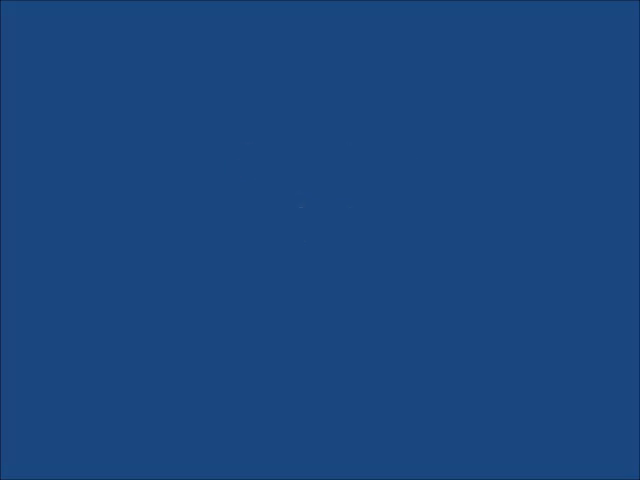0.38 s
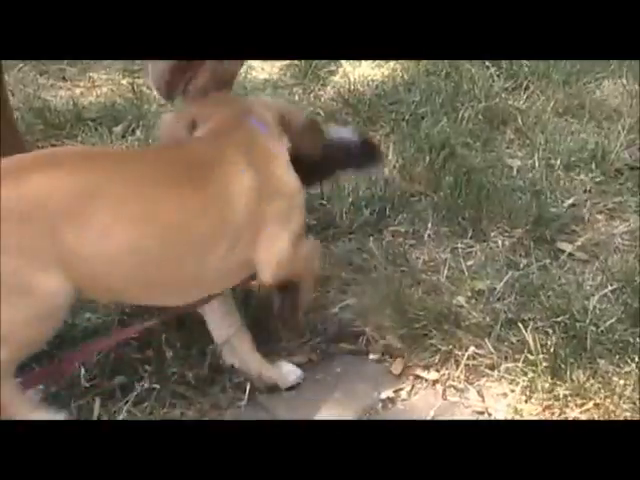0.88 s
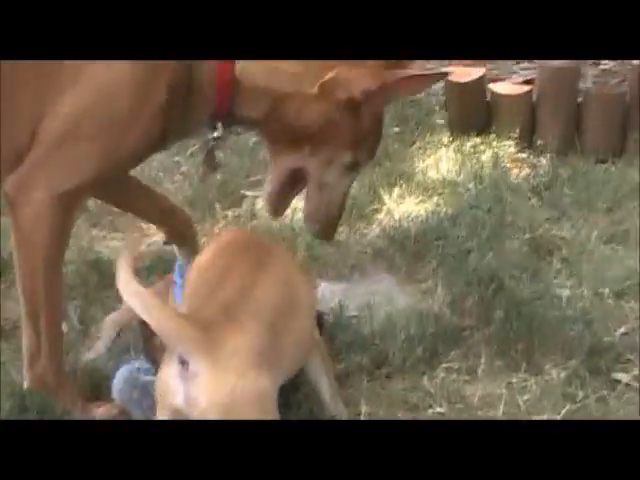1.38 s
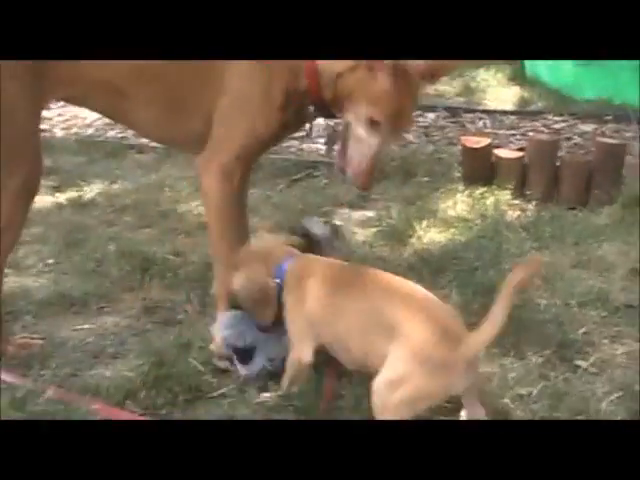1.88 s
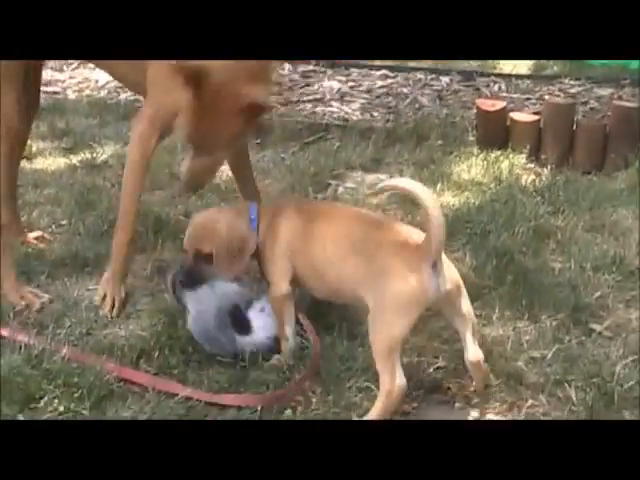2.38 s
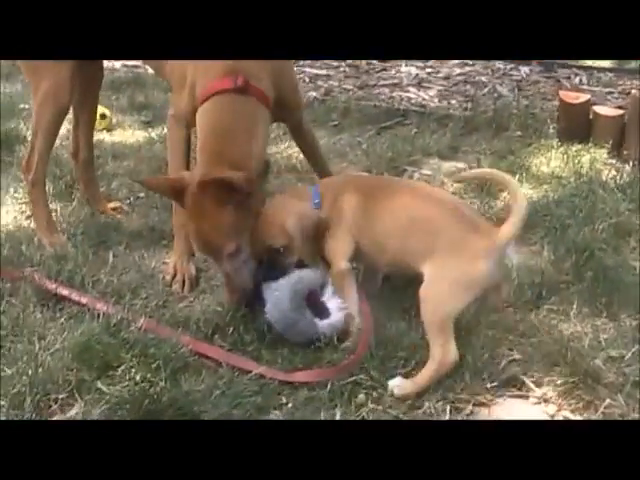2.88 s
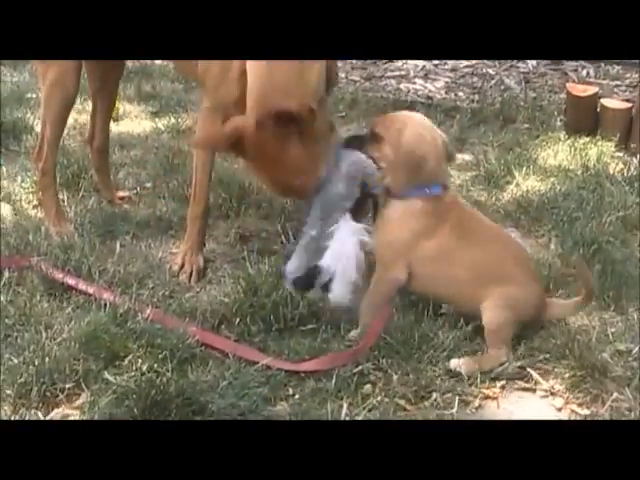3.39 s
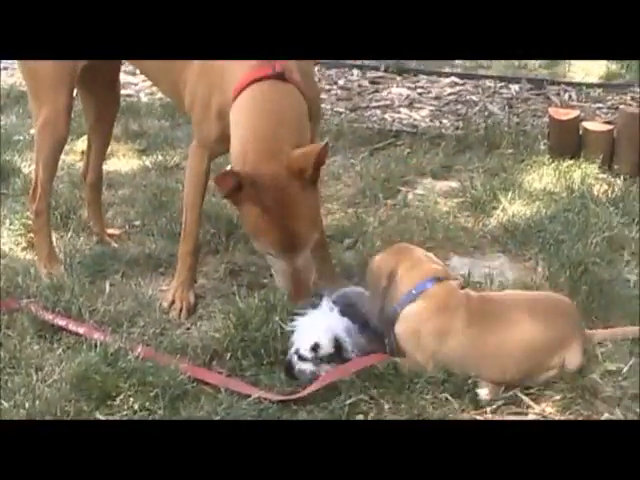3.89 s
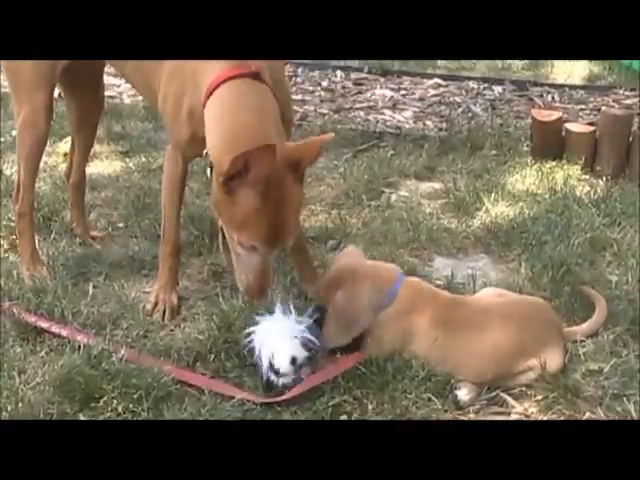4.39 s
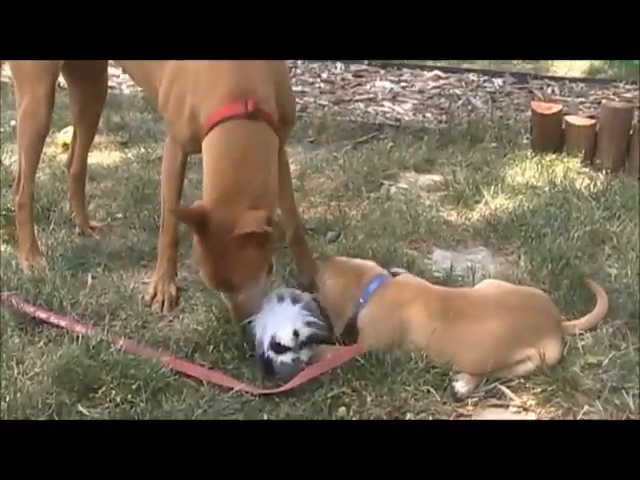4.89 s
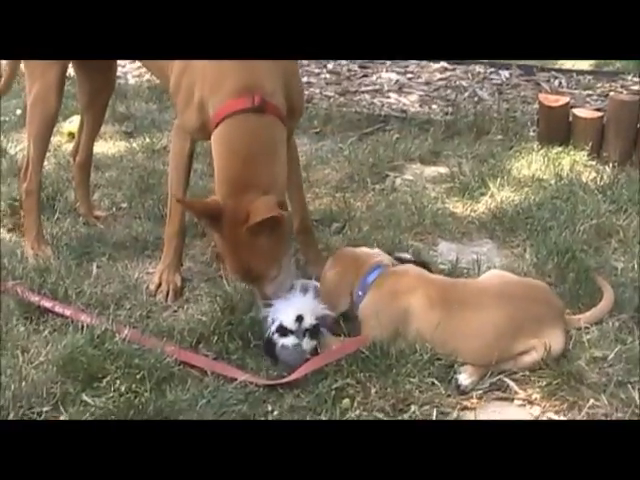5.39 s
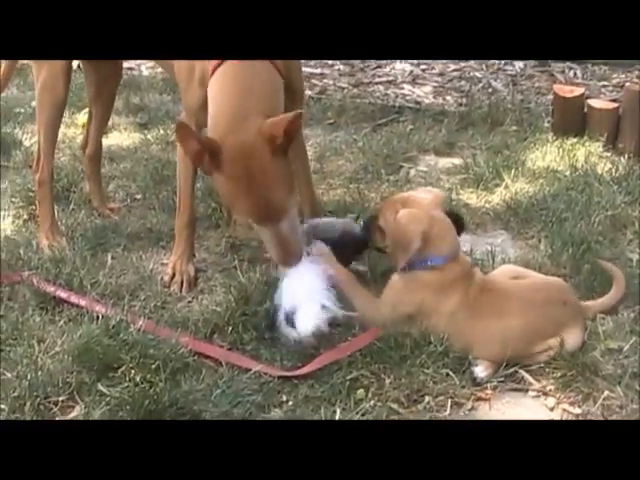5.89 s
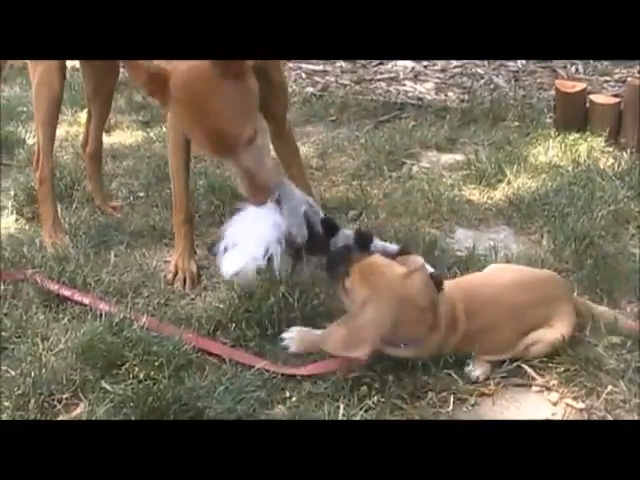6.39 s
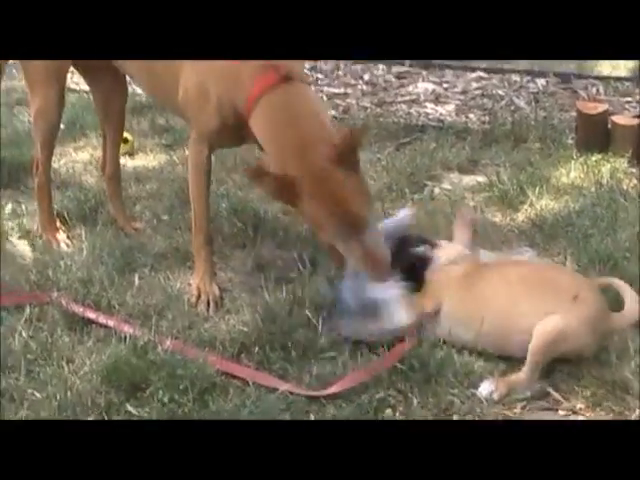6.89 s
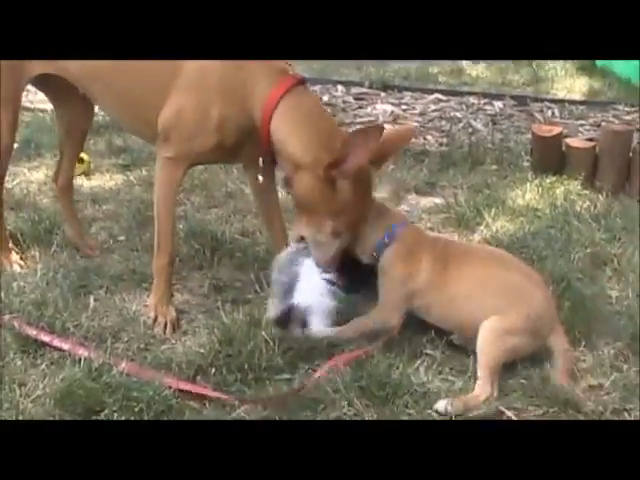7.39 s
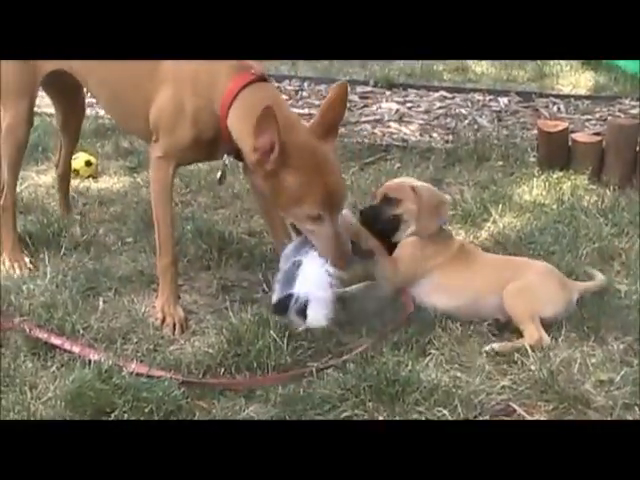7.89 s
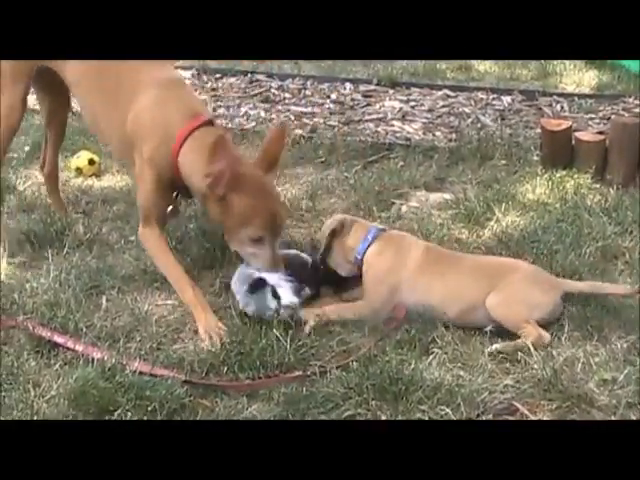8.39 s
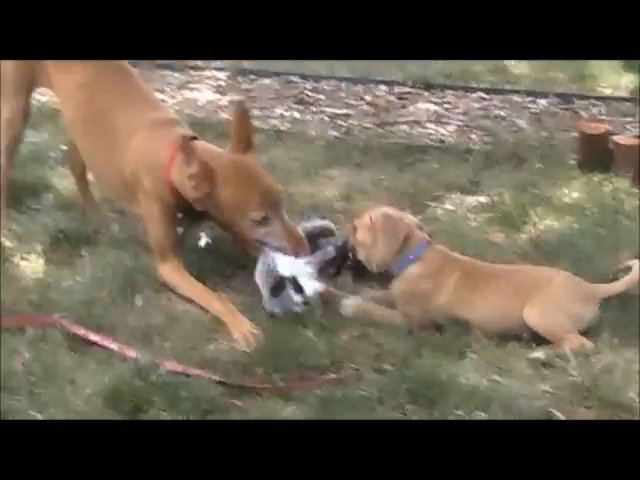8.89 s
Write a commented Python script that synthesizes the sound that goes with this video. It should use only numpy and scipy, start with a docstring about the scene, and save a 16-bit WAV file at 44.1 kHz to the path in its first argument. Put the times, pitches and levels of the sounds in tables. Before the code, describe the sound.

Close stereo pickup of a dog and puppy playing on a lawn after half a second of silence. Paws and toy drag through dry grass, twigs snap, and metal tags tick and ring, loudest around three seconds, then sparser. A woody knock comes early. Near two-note sparrow phrases mix with farther, hoarse falling cheeps and reflections. Faint town rumble and light wind lie below, with dull paw thumps and a faint growl late.

```python
"""Tug-of-war on a lawn

A dog and a puppy tug at a plush toy: struck modes ring as collar tags, noise grains rustle as grass, with snaps.
A driven hollow body knocks once, filtered clicks thump as paws, filtered pulses growl faintly.
Sparrows are gliding one- and two-voiced whistles, one near, others echoing off walls.
Below lie shaped noise and hums of a distant town, and low wind lumps.
"""
import sys
import numpy as np
from scipy import signal
from scipy.io import wavfile
from scipy.ndimage import uniform_filter1d

SR = 44100
rng = np.random.default_rng(int(sys.argv[2]) if len(sys.argv) > 2 else 0)


def master(y):
    """Save y as 16-bit WAV."""
    cut = np.clip(np.atleast_2d(y).T, -1, 1)
    pcm = np.round(cut * 32767)  # scale
    wavfile.write(sys.argv[1], SR, pcm.astype(np.int16))


def decibels_to_gain(level_db):
    """Convert a level in decibels to a linear amplitude gain (20 dB per decade)."""
    exponent = np.asarray(level_db, float) / 20
    return 10 ** exponent


N = 397782


def rms_one(x):
    """Scales to unit rms."""
    return x / np.sqrt(np.mean(x ** 2) + 1e-20)


def in_time(rows):
    """Interpolates each column over time."""
    s, *columns = np.transpose(rows)
    return [np.interp(np.arange(N) / SR, s, column) for column in columns]


def at_hz(points, hz):
    """Interpolates a curve over log frequency."""
    table_hz, values = np.transpose(points)
    return np.interp(np.log(hz), np.log(table_hz), values)


def drift(rate_hz):
    """Slow random wander of unit rms: noise through two equal poles at rate_hz, run at SR / 40."""
    r = np.exp(-80 * np.pi * rate_hz / SR)
    white = rng.standard_normal(N // 40 + 2002)
    slow = signal.lfilter([1], [1, -2 * r, r * r], white)[2000:]
    return np.interp(np.arange(N) / 40, np.arange(len(slow)), rms_one(slow - slow.mean()))


def clicks(times_s, sizes):
    """Single-sample impulses on a tiny floor."""
    out = np.full(N, 1e-18)
    np.add.at(out, np.round(np.asarray(times_s) * SR).astype(int), sizes)
    return out


def ring(x, hz, t60_s):
    """Two-pole resonator: a unit click starts a decaying sine of height 1."""
    r, w = decibels_to_gain(-60 / (t60_s * SR)), 2 * np.pi * hz / SR
    return signal.lfilter([0, np.sin(w)], [1, -2 * r * np.cos(w), r * r], x)


def band(x, low_hz, high_hz):
    """Butterworth band-pass."""
    sos = signal.butter(2, [low_hz, min(high_hz, .45 * SR)], "band", fs=SR, output="sos")
    return signal.sosfilt(sos, x)


def pan(x, left_over_right_db):
    """Splits a level difference evenly over both ports."""
    return x * decibels_to_gain(np.array([[left_over_right_db / 2], [-left_over_right_db / 2]]))


def swells(rows):
    """Sum of humps that swell linearly to a peak and fade linearly."""
    t = np.arange(N) / SR
    return sum(decibels_to_gain(db) * np.interp(t, [s - up_s, s, s + down_s], [0, 1, 0]) for s, db, up_s, down_s in rows)


# Stereo likeness: (frequency [Hz], left-right likeness [-1..1])
LIKENESS = [(40, .2), (80, 0.35), (160, 0.022), (300, 0), (700, 0.21), (1400, 0.4), (3000, 0.028),
            (8000, 0.29)]
# Stereo balance: (frequency [Hz], left over right [dB])
BALANCE_DB = [(60, 0.5), (500, 2), (2000, 1.5), (8000, 0.5)]


def coloured(white, spectrum, patchy_db):
    """Half-octave bands of (draw, mid/side) noise, each with its level, flicker, likeness and balance."""
    out = 0
    edges_hz = 20 * 2 ** np.arange(0, 10.1, .5)
    for k, (low_hz, high_hz) in enumerate(zip(edges_hz, edges_hz[1:])):
        mid, side = band(white[k % 2], low_hz, high_hz)
        centre_hz = np.sqrt(low_hz * high_hz)
        alike = np.clip(at_hz(LIKENESS, centre_hz), -.95, .95)
        both = np.sqrt(1 + alike) * mid + np.sqrt(1 - alike) * side * [[1], [-1]]
        level_db = at_hz(spectrum, centre_hz) + patchy_db * drift(2.77)
        out = out + decibels_to_gain(level_db) * pan(both, at_hz(BALANCE_DB, centre_hz))
    return out


# Tag touches: (time [s], tick drive [dB], ring drive [dB], family struck hardest)
TAG_TOUCHES = [(.6115, -41, -48, "c"), (.6333, -42, -55, "d"), (1.14, -33, -50, "d"),
               (1.452, -39, -43, "a"), (1.9739, -32, -44, "d"), (2.418, -36, -43.5, "b"),
               (2.4693, -32, -55, "d"), (2.6786, -30, -40.5, "d"), (2.8486, -15, -32, "b"),
               (2.8613, -17, -34, "b"), (2.8691, -14, -27.5, "b"), (2.9684, -42, -55, "d"),
               (3.29, -18.5, -38, "a"), (3.4291, -29, -58, "d"), (3.464, -34, -45, "a"),
               (3.7389, -39, -52, "d"), (4.421, -44, -59.5, "d"), (4.6907, -41, -54, "d"),
               (4.7451, -50, -58, "d"), (5.0941, -52, -67, "d"), (5.1487, -50, -59, "d"),
               (5.4999, -45, -52.5, "d"), (6.2974, -42, -59, "d"), (7.0058, -44, -55, "d"),
               (7.171, -24, -44.5, "d"), (7.1906, -17, -39, "b"), (7.5331, -44, -56, "d"),
               (8.0012, -39, -52.5, "d"), (8.448, -42, -51, "d"), (8.659, -40, -45, "c")]
# Tag modes: (frequency [Hz], level in family [dB], t60 [s], family)
TAG_MODES = [(9553, -1, .3, "a"), (9565, -2, .3, "a"), (14560, -6, .08, "a"), (10580, 2, 0.052, "b"),
             (10680, 5, 0.035, "b"), (5300, -4, .04, "b"), (11130, 6, 0.056, "c"), (13915, 1.5, .08, "c"),
             (12140, 14.5, 0.049, "d"), (7760, -.5, .05, "d")]
# Family coupling, rows = struck a-d: (gain of a [dB], of b [dB], of c [dB], of d [dB])
FAMILY_DB = [(-1, -16, -12, -16), (-26, 0.5, -16, -12.5), (-6, -10, 2.5, -26), (-5, -4.5, -11, -1)]


def tags():
    """Each touch ticks brightly, rings one metal mode family hardest and drives the others along."""
    spread_db = 3.5   # from touch to touch, on gains below 0 dB
    s, tick_db, ring_db = np.transpose([row[:3] for row in TAG_TOUCHES])
    struck = ["abcd".index(row[-1]) for row in TAG_TOUCHES]
    chance = rng.standard_normal((len(s), len(TAG_MODES)))
    out = decibels_to_gain(2.5) * band(clicks(s, decibels_to_gain(tick_db)), 4000, 17000)
    for k, (hz, mode_db, t60_s, family) in enumerate(TAG_MODES):
        along_db = np.array(FAMILY_DB)[struck, "abcd".index(family)]
        varied_db = along_db + spread_db * (along_db < 0) * chance[:, k - 1]
        sign = np.where(along_db != 0, np.sign(chance[:, k]), 1)
        out = out + ring(clicks(s, sign * decibels_to_gain(ring_db + mode_db + varied_db)), hz, t60_s)
    right = 0.59 * (out + np.roll(out, 1))   # half a sample late, slightly duller
    return np.array([out, right])


# Paws and toy dragging through grass: (time [s], level around 6.7-8.7 kHz [dB])
RUSTLE = [(.6, -53.5), (1.2, -54.5), (1.55, -56.5), (1.8, -53), (2.1, -63), (2.65, -56.5), (3.08, -57.5),
          (3.35, -62.5), (3.8, -57), (4.5, -66.5), (5.2, -72), (5.8, -67.5), (6.1, -61.5), (6.4, -60.5),
          (7, -60), (9.02, -62.5)]
# Quick scuffs, same level scale: (peak time [s], level [dB], swell [s], fade [s])
SCUFFS = [(6.927, -51.5, 0.012, 0.039), (7.6, -56.5, 0.2, 0.15), (8.48, -62.5, 0.2, 0.089)]
# Rustle colour: (frequency [Hz], relative density [dB per Hz])
GRASS_SPECTRUM = [(900, -16), (1500, 1.5), (3500, 2), (7000, 0.5), (12400, -2.5), (16000, -61)]


def grass():
    """Bending blades: clumped noise grains of random height, coloured, plus crackle."""
    height = decibels_to_gain(1.9 * np.minimum(rng.exponential(1, N), 6))
    grains_per_s = 6000 * decibels_to_gain(4 * drift(25))
    grain = height * (rng.random(N) < grains_per_s / SR)
    white = rng.standard_normal((2, 2, N)) * grain * [[1], [.6]]
    rustle = coloured(white, GRASS_SPECTRUM, patchy_db=2.0)
    rustle_db, = in_time(RUSTLE)
    level = decibels_to_gain(rustle_db) + swells(SCUFFS)
    return rustle * level / np.std(band(rustle, 6740, 8650)) + crackle(level)


def crackle(level):
    """Lone dry blades break by chance, louder as the grass rustles more."""
    born = rng.random(N) < 45 / SR   # 45 per s on average
    sizes = decibels_to_gain(24.5 + 2.3 * rng.standard_normal(N)) * rng.choice([-1, 1], N)
    return level * band(born * sizes + 1e-18, 3400, 10000)


# Dry grass and twigs snapping under paws: (time [s], peak [dB], snap frequency [Hz])
SNAPS = [(0.6424, -27.5, 6600), (0.6975, -27, 7140), (0.7058, -21.5, 8250), (0.725, -27.5, 1290),
         (0.848, -29, 6500), (.87, -28.5, 1130), (.908, -35, 8500), (1.636, -33, 8000), (1.955, -31, 2700),
         (2.8334, -34, 9000), (3.2117, -31, 9000), (3.7384, -29, 5270), (4.1984, -33.5, 9000),
         (4.977, -37, 8000), (5.61, -32, 5000), (5.7564, -33.5, 3280), (6.194, -33, 8000),
         (6.921, -27, 6000), (6.9493, -26.5, 4870), (7.161, -31, 4430), (7.4923, -36, 6500),
         (7.5288, -31.5, 5330), (7.615, -29, 4000), (8.0504, -30, 8000), (8.4735, -33, 6000),
         (8.4815, -29, 8000), (8.5318, -28.5, 8000), (8.5619, -36, 5500), (8.6714, -31.5, 7000),
         (8.944, -30, 8000)]


def snaps():
    """Each break is a few ms of noise fizz banded around its pitch."""
    out, size = np.zeros(N), 400
    fade = np.arange(size) * np.exp(-np.arange(size) / (0.00046 * SR))
    for s, db, hz in SNAPS:
        snap = band(rng.standard_normal(size) * fade, hz / 2.0, hz * 1.28)
        at = round(s * SR)
        out[at:at + size] += decibels_to_gain(db) * snap / np.max(np.abs(snap))
    return out


# Blows on the hollow body: (time [s], drive [dB])
KNOCK = [(1.8021, -9), (1.8109, -24)]
# Body modes: (frequency [Hz], relative level [dB], t60 [s])
KNOCK_MODES = [(1820, -10, 0.027), (2060, -3, 0.012), (1400, -19, 0.03), (2680, -13, 0.02), (930, -9, 0.03),
               (540, -21, .035)]


def knock():
    """A soft contact drives a hollow body's modes, off to the left."""
    right_lag_s, right_early_share = 0.00055, 0.57
    s, db = np.transpose(KNOCK)
    blow = band(clicks(s, decibels_to_gain(db)), 660, 3500)
    left = sum(decibels_to_gain(mode_db) * ring(blow, hz, t60_s) for hz, mode_db, t60_s in KNOCK_MODES)
    return np.array([left, np.roll(left, round(right_lag_s * SR)) + right_early_share * left])


# Paws landing on turf: (time [s], drive [dB], frequency [Hz])
THUMPS = [(8.33, -32, 230), (8.415, -33, 460)]


def paws():
    """Each landing is a short dull resonance."""
    return sum(band(ring(clicks([s], decibels_to_gain(db)), hz, .04), 60, 900) for s, db, hz in THUMPS)


def growl():
    """Low throaty rumble: uneven glottal pulses through two throat resonances."""
    start_s, loudest_s, end_s = 8.54, 8.6, 8.9
    pitch_hz, peak_db = 144.6, -50
    hump = swells([(loudest_s, peak_db, loudest_s - start_s, end_s - loudest_s)])
    level = hump ** 2 / decibels_to_gain(peak_db)
    cycles = np.cumsum(pitch_hz * (1 + 0.048 * drift(30))) / SR
    pulses = np.diff(np.floor(cycles), prepend=0) * (1 + 0.8 * rng.standard_normal(N))
    return level * rms_one(ring(pulses, 277, 0.058) + 0.53 * ring(pulses, 160, 0.039))


def birds():
    """Near notes come mostly direct, far cheeps mostly as scattered echoes; fence and house reflect."""
    near, lone, far = phrases() + links() + whistles(), lone_notes(), cheeps()
    behind = lone + decibels_to_gain(-5) * far
    fence = pan(np.roll(near, round(.025 * SR)) * decibels_to_gain(-7), -4)
    house = pan(np.roll(behind, round(.1 * SR)) * decibels_to_gain(-12), 1)
    scattered = scatter(decibels_to_gain(-3) * near + decibels_to_gain(-2) * lone + decibels_to_gain(3) * far, t60_s=.36, per_s=900)
    return near + behind + fence + house + scattered


def sing(start_s, hz, level, upper, rough, gap_hz=370):
    """A whistle and a second voice gap_hz above it (upper = its share); rough flutters pitch and level."""
    out, at, size = np.zeros(N), round(start_s * SR), len(hz)
    tremble, flutter = uniform_filter1d(rng.standard_normal((2, size)), size=50) * rough
    phase = 2 * np.pi * np.cumsum(hz) / SR + np.cumsum(tremble)
    gap = 2 * np.pi * gap_hz * np.arange(size) / SR
    voices = np.sin(phase) + upper * np.sin(phase + gap)
    out[at:at + size] = (level * (1 + 40 * flutter) * voices)[:N - at]
    return out


def arch(s, top_hz, db, rise_s, fall_s, bow, fade, gap_hz=370):
    """Climb to the top and drop back, second voice near the top; bow flattens it, fade hides the drop."""
    foot_hz = 3080
    t = np.arange(-rise_s, fall_s, 1 / SR)
    u = np.where(t < 0, t / rise_s, t / fall_s)
    shape = np.clip(1 - u ** 2, 0, 1) ** np.where(t < 0, 1.2, fade)
    upper = .9 * np.exp(-(u / .6) ** 2)
    hz = top_hz - (top_hz - foot_hz) * np.abs(u) ** bow
    return sing(s + t[0], hz, decibels_to_gain(db) * shape, upper, .045, gap_hz)


# Near sparrow's phrases: (top of second note [s], time since first [s],
# first note's lower voice [dB], second note's lower voice [dB], second top [Hz])
PHRASES = [(0.986, .086, -39, -34.5, 4650), (1.562, 0.1, -38, -36, 4480), (2.082, 0.099, -36.5, -38, 4575),
           (2.769, 0.1, -40, -36, 4470), (3.96, 0.086, -47, -38.5, 4520),
           (4.558, 0.097, -36.5, -33.5, 4560), (6.171, 0.09, -39, -34.5, 4647),
           (6.622, 0.095, -38, -36, 4670), (8.074, 0.091, -41.5, -37.5, 4660), (8.95, 0.12, -59, -48, 4500)]


def phrases():
    """Near sparrow: arched first note, rising stroke, slower arched second note."""
    out, size = 0, round(0.028 * SR)
    stroke_hz = np.linspace(3280, 4325, size)
    for s, gap_s, first_db, second_db, top_hz in PHRASES:
        out = out + arch(s - gap_s, top_hz + 50, first_db, .034 * 0.96, .017, bow=2.1, fade=1.1)
        out = out + arch(s, top_hz, second_db, .034 * 1.25, .017, bow=1.8, fade=1.1)
        stroke_level = decibels_to_gain(second_db - 7) * np.sqrt(np.hanning(size))
        out = out + sing(s - .06, stroke_hz, stroke_level, 0, rough=.035)
    return out


# Links outside the phrases: (time at bottom [s], bottom [Hz], lower voice [dB])
LINKS = [(.79, 3510, -43.5), (1.855, 3710, -45.5), (2.226, 3830, -45), (4.73, 3540, -46), (6.42, 3250, -50)]


def links():
    """Weak sag to the bottom, climb on which the second voice joins, quick drop; one follows each phrase."""
    t = np.arange(-.014, .036, 1 / SR)
    bend_hz = np.interp(t, [-.014, 0, .008, .026, .036], [250, 0, 150, 1050, 800])
    upper = np.interp(t, [.008, .02], [0, .7])
    level = np.interp(t, [-.014, -.008, .008, .024, .036], [0, .3, .3, 1, 0])
    after_phrases = [(s + .056, 3190, second_db - 5) for s, _, _, second_db, _ in PHRASES]
    return sum(sing(s - .014, hz + bend_hz, decibels_to_gain(db) * level, upper, rough=0.06)
               for s, hz, db in LINKS + after_phrases)


# Thin single whistles: (start [s], end [s], start pitch [Hz], end pitch [Hz], level [dB])
WHISTLES = [(6.35, 6.42, 5800, 4900, -53), (7.72, 7.755, 4620, 4600, -58), (7.785, 7.84, 4650, 4550, -56),
            (3.265, 3.295, 3200, 5300, -55), (3.752, 3.785, 3450, 3800, -51),
            (3.785, 3.82, 3050, 3000, -52), (4.79, 4.865, 3350, 3000, -51), (5.848, 5.857, 4100, 4600, -50),
            (5.862, 5.91, 3750, 3600, -54)]


def whistles():
    """Lone one-voiced glides with short soft edges."""
    out = 0
    for start_s, end_s, start_hz, end_hz, db in WHISTLES:
        size = round((end_s - start_s) * SR)
        level = decibels_to_gain(db) * np.hanning(size) ** 0.044
        out = out + sing(start_s, np.linspace(start_hz, end_hz, size), level, 0, rough=0.045)
    return out


# A third sparrow's lone notes: (time at top [s], top [Hz], lower voice [dB])
LONE_NOTES = [(.717, 5200, -44), (1.086, 5100, -40), (1.187, 3950, -49.5), (1.432, 5100, -43.5),
              (1.779, 5220, -38), (2.152, 5710, -35), (2.577, 5630, -35.5), (2.985, 5560, -44),
              (3.705, 4680, -52), (5.186, 5160, -52), (5.938, 5050, -53), (8.262, 5030, -53.5),
              (8.845, 5100, -52)]


def lone_notes():
    """Third sparrow: single two-voiced arches whose drop is nearly hidden."""
    return sum(arch(s, hz, db, .02, .034, bow=2.6, fade=2.6, gap_hz=430) for s, hz, db in LONE_NOTES)


# Far sparrow's falling cheeps: (start [s], reference pitch [Hz], relative level [dB], hoarseness [factor])
CHEEPS = [(0.926, 5500, -47, 1.6), (1.425, 5120, -48, 2.5), (2.554, 5820, -45.5, 1.8),
          (2.97, 5500, -46, 1.4), (3.425, 5670, -49.5, 2), (3.91, 5590, -46, 1.5), (4.144, 5310, -53, 1.9),
          (4.307, 5700, -44.5, 1.47), (4.748, 5760, -48, 2.1), (5.41, 5640, -46.5, 1.5),
          (6.057, 5870, -48, 2.17), (6.69, 5630, -48.5, 2.5), (7.206, 5630, -45, 1.16)]


def cheeps():
    """Far sparrow: a held two-voiced top, then a hoarse, weak slide down to a low tail."""
    marks_s = np.cumsum([0, .008, .045, .025, .06, .01])
    t = np.arange(0, marks_s[-1], 1 / SR)
    bend = np.interp(t, marks_s, [.95, 1.01, .985, .7, .57, .56])
    level = np.interp(t, marks_s, [.3, 1, .75, .14, .36, .05])
    upper = np.interp(t, marks_s, [1, 1, .75, .1, 1, 0])
    rough = np.interp(t, marks_s, [.04, .04, .07, .35, .15, .12])
    return sum(sing(s, hz * bend, decibels_to_gain(db) * level, upper, rough * hoarse, gap_hz=480)
               for s, hz, db, hoarse in CHEEPS)


def scatter(x, t60_s, per_s):
    """Many small decaying echoes from leaves and houses, different at each port."""
    size = int(t60_s * SR)
    present = rng.random((2, size)) < per_s / SR
    taps = rng.standard_normal((2, size)) * present * decibels_to_gain(-60 * np.arange(size) / size)
    taps /= np.sqrt(np.sum(taps ** 2, axis=1, keepdims=True) + 1e-12)
    return signal.fftconvolve(x[None], taps, axes=1)[:, :N]


# Distant noise colour: (frequency [Hz], relative density [dB per Hz])
TOWN_SPECTRUM = [(15, -39), (25, -15.5), (59, -4.5), (82, -0.5), (414, -8), (769, -9.5), (905, -7),
                 (2460, -20.5), (5370, -18), (7000, -35), (15000, -37)]
# Far engines: (frequency [Hz], width [Hz], level [dB])
HUMS = [(74.9, 15, -57), (156.9, 11, -70), (233.5, 7.7, -63), (932, 160, -60)]


def town():
    """Far traffic: smooth coloured noise with a few wavering narrow-band hums."""
    far = coloured(rng.standard_normal((2, 2, N)), TOWN_SPECTRUM, patchy_db=1.17)
    far *= decibels_to_gain(-49) / np.std(band(far, 404, 1160))   # rms in this band: -49 dB
    for hz, width_hz, db in HUMS:
        hum = band(rng.standard_normal(N), hz - width_hz / 2, hz + width_hz / 2)
        far += decibels_to_gain(db + 2.54 * drift(2.16)) * rms_one(hum)
    return far


# Gusts: (peak time [s], level over the steady wind at the left port [dB], swell [s], fade [s])
WIND = [(2.8, -52, 0.34, 1), (5.68, -45, .16, 0.42)]


def wind():
    """Low pressure lumps on the microphone ports, weaker and inverted on the right."""
    lumps = rms_one(band(rng.standard_normal(N), 28, 68))
    steady_db = -61
    return (decibels_to_gain(steady_db) + swells(WIND)) * lumps * [[1.0], [-.6]]


def scene():
    """All sources at the two microphone ports."""
    return tags() + grass() + snaps() + knock() + paws() + growl() + birds() + town() + wind()


def top_cut(x):
    """Nothing passes above the cut-off."""
    return signal.sosfilt(signal.butter(12, 17000, fs=SR, output="sos"), x)


def record(dry):
    """Silence until the sound switches on within a few ms; a steep low-pass removes the top."""
    start_s, ramp_s, cutoff_hz = 0.568, 0.0069, 15750
    on = np.clip((np.arange(N) / SR - start_s) / ramp_s, 0, 1)
    low_pass = signal.ellip(10, .5, 70, cutoff_hz, fs=SR, output="sos")
    mix = signal.sosfilt(low_pass, dry * on)
    return top_cut(mix)


dry = scene()
out = record(dry)
master(out)
```